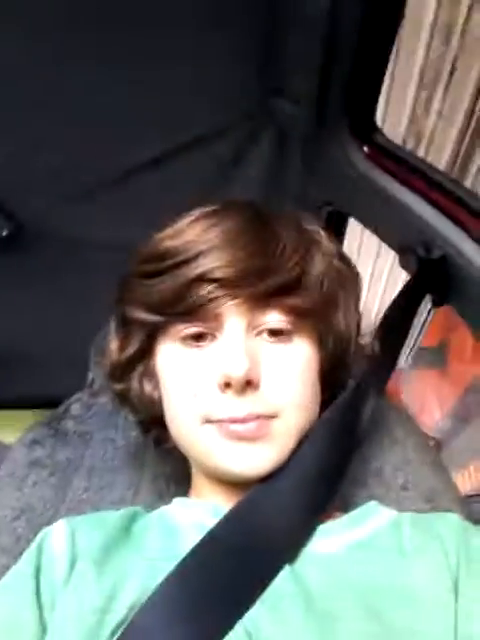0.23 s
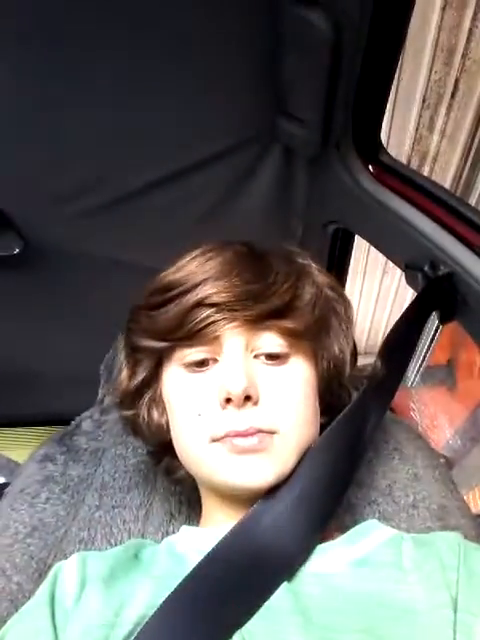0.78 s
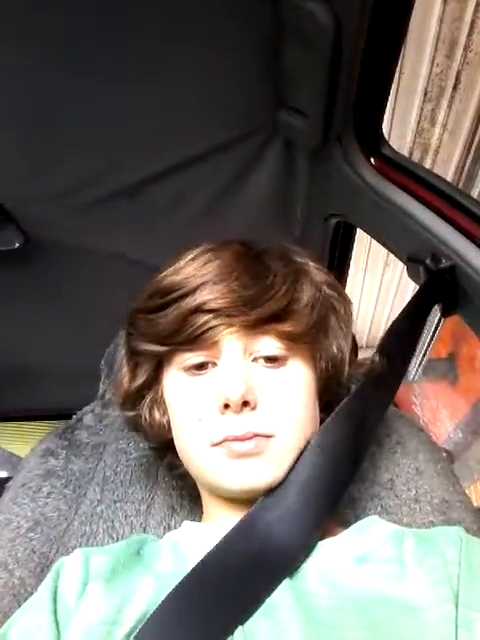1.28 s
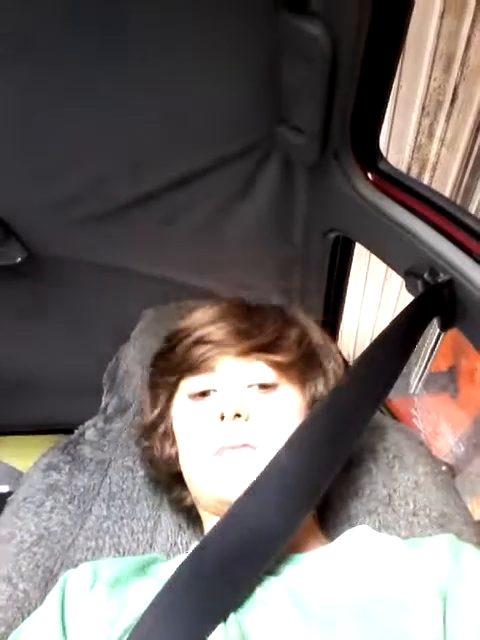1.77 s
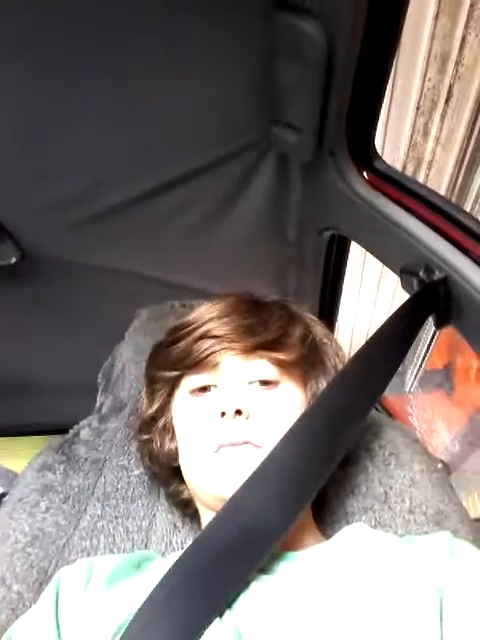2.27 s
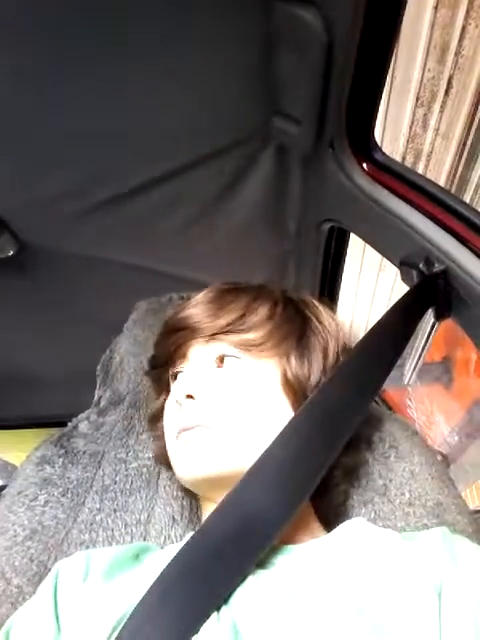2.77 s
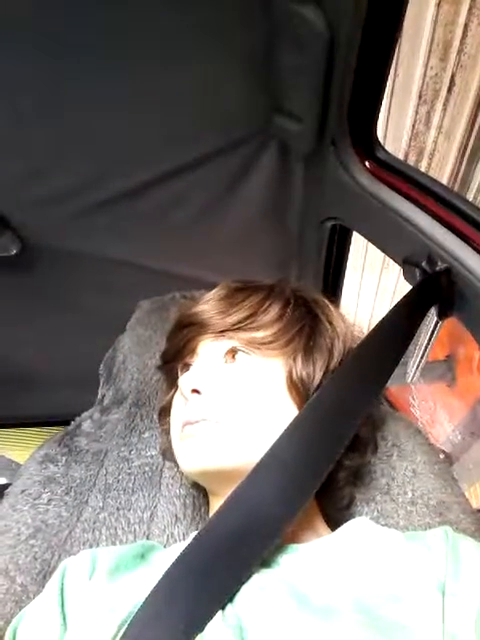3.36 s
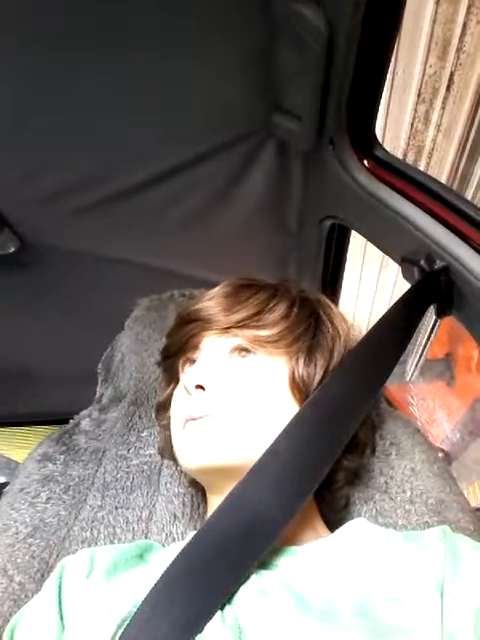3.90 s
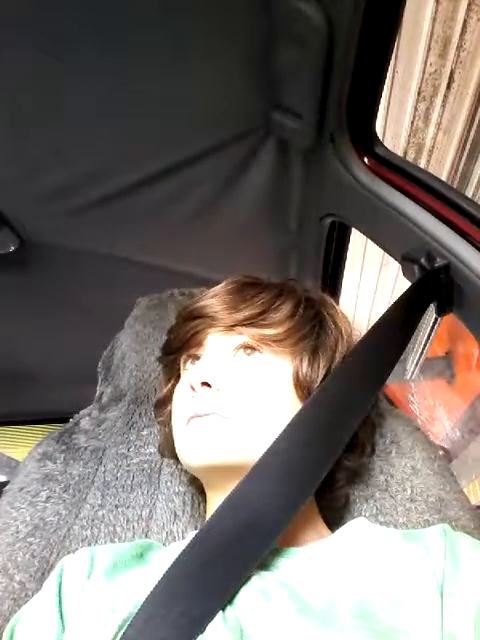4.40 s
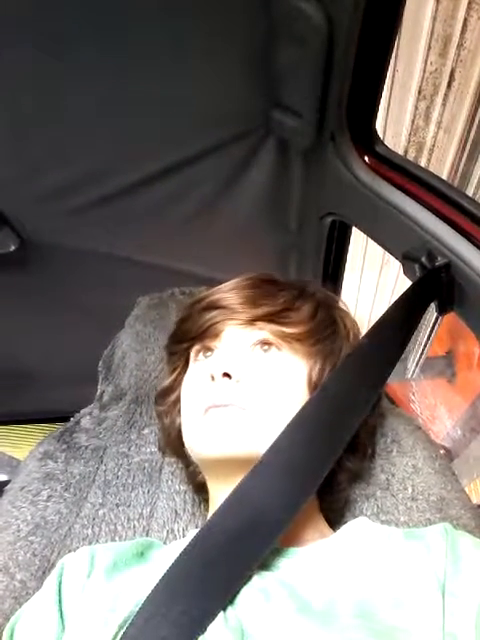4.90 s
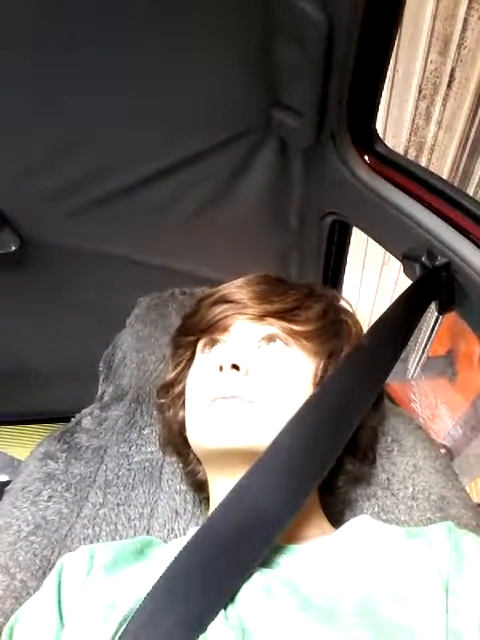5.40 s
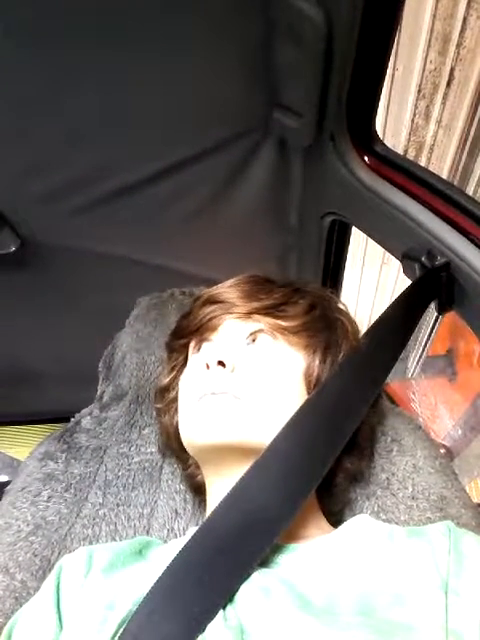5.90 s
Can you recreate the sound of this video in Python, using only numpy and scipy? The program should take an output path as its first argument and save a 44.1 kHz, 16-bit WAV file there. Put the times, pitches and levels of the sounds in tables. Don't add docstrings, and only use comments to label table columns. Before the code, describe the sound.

A small handheld microphone in a car cabin picks up car wash blowers outside. The shaken bodywork rumbles unevenly beneath a broad, dull rush of air. Fluttering hiss and tiny crackling spits of spray build from about one and a half seconds, then shrink back just before three. The rumble weakens in steps, leaving softer roar and a swelling mid-pitched blade tone.

```python
import sys
import numpy as np
from scipy import signal
from scipy.fft import rfft, irfft, next_fast_len
from scipy.io import wavfile
from scipy.ndimage import uniform_filter1d

SR = 44100
rng = np.random.default_rng(int(sys.argv[2]) if len(sys.argv) > 2 else 0)


def boost_factor(decibels):
    exponent = np.asarray(decibels, float) / 20
    return 10 ** exponent


def file_out(sig):
    cols = np.atleast_2d(sig).T
    lim = np.clip(cols, -1, 1)
    pcm = np.round(lim * 32767).astype(np.int16)
    wavfile.write(sys.argv[1], SR, pcm)


N = 271038
SIZE = 1024


def rumble():
    # start_s, level_db (under full blast)
    jet = [
        (0, 1),
        (1.5, -.5),
        (1.8, 0),
        (2.3, -0.5),
        (2.9, -6),
        (3.6, -5.5),
        (4.2, -5),
        (5.0, -11),
        (6.15, -11.5),
    ]
    # start_s, roof_lift_db, door_lift_db
    buffets = [(.11, -4, -1.5), (.37, 5, 2.5), (.5, 4, 3.5), (.66, 5.5, 3.5), (.81, -3.5, 0.5),
               (.9, 1, 3.5), (1.07, 0, 6.5), (1.15, 5, -3), (1.22, -18, 4), (1.46, 2, 1.5), (1.53, 4.5, 3),
               (1.68, 9, -4), (1.77, 2, 6), (1.87, 3.5, -2), (1.95, 6, -8), (2.11, -1, 4.5), (2.19, -5, 4),
               (2.33, 2, 0), (2.48, 4, 2), (2.79, 4.5, 3.5), (2.92, -1.5, -1.5), (3.04, 5.5, -0.5),
               (3.27, -3, 0), (3.61, 1.5, 4.5), (3.93, 5, 0), (4.25, 0.5, -2), (4.54, 1, 3), (5.0, 1, 3),
               (5.19, 6.5, -1.5), (5.95, 1.5, 4)]
    # pitch_hz, level_db (per Hz)
    roof = [(25, -44), (40, -35.5), (52, -7.5), (66, 0.5), (76, 3.5), (88, -5), (97, 12.5), (104, -8.5),
            (112, -1), (135, -7), (200, -61.5), (500, -130)]
    # pitch_hz, level_db (per Hz)
    doors = [(60, -15), (100, -16), (122, 0), (150, -0.5), (172, 1.5), (190, -7), (220, -12), (260, -24.5),
             (400, -80.5), (900, -130)]
    buffet_s = 0.041
    jet_db = curve(jet, column=1)
    roof_db = -23.5 + 1.06 * jet_db + bells(buffets, buffet_s, column=1)
    doors_db = -23 + 0.9 * jet_db + bells(buffets, buffet_s, column=2)
    return panel(roof, 45, 115, roof_db) + panel(doors, 115, 210, doors_db)


def panel(shape, low_hz, high_hz, push_db):
    shake = coloured(lambda hz: read(shape, hz), low_hz, high_hz)
    steadied = shake / np.sqrt(uniform_filter1d(shake ** 2, size=7500))
    return boost_factor(push_db) * steadied


def roar():
    # pitch_hz, level_db (per Hz)
    fan_noise = [(120, -24), (200, -1.5), (290, 2), (330, -3.5), (500, -7.5), (640, -6.5), (1200, -16.5),
                 (1750, -19), (2000, -23), (2500, -23.5), (3800, -28.5), (5300, -36), (7400, -46.5),
                 (9500, -110)]
    # pitch_hz, width_hz, level_db
    cabin = [(276, 100, 2), (321, 18, 1), (356.3, 20, 5), (628, 83, 3), (849, 23, 4), (970, 100, -4.5),
             (1052, 89, 3.5), (1110, 52, 1.5), (1444, 58, 2.5), (1580, 45, 1), (2420, 170, 2),
             (3180, 690, 1), (4300, 200, 1.5), (4540, 150, -2.5)]
    full_db, leave_s, fade_db_per_s = -34, 1.55, -0.6465
    air = coloured(lambda hz: read(fan_noise, hz) + sum(bump(hz, *mode) for mode in cabin), 324, 3000)
    fans_db = full_db + fade_db_per_s * np.maximum(np.arange(N) / SR - leave_s, 0)
    return boost_factor(fans_db) * patchy(air, patchy_db=0.5)


def blades():
    # pitch_hz, width_hz (of its wander)
    blade_line = (591, 7.2)
    # start_s, level_db
    beats = [
        (1.0, 9.5),
        (1.55, -2),
        (2.25, 4),
        (3.0, 3),
        (4.15, -6),
        (4.47, -2),
        (4.9, 7),
        (5.32, 9),
        (5.62, -1),
        (5.9, 7),
    ]
    beat_s = 0.12
    clear_db, mask_db, clears_s = -47, -2.5, 7.4
    blade_hz, width_hz = blade_line
    tone = coloured(lambda hz: -20 * np.log10(1 + (2 * (hz - blade_hz) / width_hz) ** 2), 300, 3000)
    steadied = tone / np.sqrt(uniform_filter1d(tone ** 2, size=16000))
    blade_db = clear_db + mask_db * np.clip(1 - np.arange(N) / SR / clears_s, 0, 1)
    return boost_factor(blade_db + bells(beats, beat_s, column=1)) * steadied


def seal():
    # start_s, level_db (of the hiss)
    leak = [(0, -59), (.75, -58), (1.2, -56), (1.49, -52.5), (1.68, -54), (1.76, -51.5), (2.1, -50.5),
            (2.27, -53.5), (2.32, -50.5), (2.58, -49.5), (2.66, -55), (2.86, -55), (2.94, -61),
            (3.3, -59.5), (3.69, -61), (3.96, -58.5), (6.15, -61.5)]
    # start_s, level_db (over the hiss), length_s
    spits = [(1.387, 1, .02), (1.476, 2, 0.016), (1.625, 4.5, 0.014), (1.709, -5.5, .015),
             (1.742, 4.5, .012), (1.788, 3.5, .02), (1.983, 5.5, .02), (2.052, 5, .02), (2.083, 4, 0.013),
             (2.308, 2.5, .015), (2.334, 1.5, .02), (2.39, 3, .015), (2.603, 1, .013), (2.653, 7.5, 0.033),
             (2.775, 1, .015), (2.818, 1, 0.018), (2.99, 10.5, .025), (3.242, 0, 0.013), (3.355, 5, .02)]
    # pitch_hz, level_db (per Hz)
    hiss_colour = [(1500, -24), (3000, -9), (5500, -12), (7000, -15.5), (7600, -21.5), (8300, -38),
                   (9500, -60), (12000, -110)]
    # pitch_hz, level_db (per Hz)
    fizz_colour = [(3000, -63), (7000, 3), (8300, -1.5), (10200, -4.5), (10800, -4), (13000, -5.5),
                   (16000, -5.5)]
    # pitch_hz, width_hz, level_db
    port = (6430, 860, 12.3)
    t = np.arange(N) / SR
    spits_db = sum(db * np.exp(-(2 * (t - start_s) / length_s) ** 2) for start_s, db, length_s in spits)
    hiss_db = curve(leak, column=1)
    fizz_db = -74 + 0.58 * (hiss_db - leak[0][1])
    wetness = np.clip((hiss_db + 57.0) / 10, 0.2, 1)
    gust_db = wetness * (1.6 * flutter(8, 40) + 1.4 * flutter(40, 250))
    hiss = coloured(lambda hz: read(hiss_colour, hz) + bump(hz, *port), 5860, 7200)
    fizz = coloured(lambda hz: read(fizz_colour, hz), 8500, 15500)
    hiss = boost_factor(hiss_db - 0.5 + spits_db + gust_db) * patchy(hiss, patchy_db=-1.0)
    return hiss + boost_factor(fizz_db + 0.7 * spits_db + 0.98 * gust_db) * fizz


def evened(x):
    return x / np.sqrt(np.mean(x ** 2) + 1e-20)


def read(points, hz):
    f, value = np.transpose(points)
    return np.interp(np.log(hz + 1), np.log(f + 1), value)


def curve(rows, column):
    columns = np.transpose(rows)
    return np.interp(np.arange(N) / SR, columns[0], columns[column])


def bells(rows, length_s, column):
    t = np.arange(N) / SR
    return sum(row[column] * np.exp(-((t - row[0]) / length_s) ** 2) for row in rows)


def bump(hz, centre_hz, width_hz, db):
    return db / (1 + (2 * (hz - centre_hz) / width_hz) ** 2)


def coloured(colour_db, low_hz, high_hz):
    length = next_fast_len(N)
    hz = np.fft.rfftfreq(length, 1 / SR)
    z = rfft(rng.standard_normal(length)) * boost_factor(colour_db(hz))
    in_band = (hz > low_hz) & (hz < high_hz)
    share = np.sum(abs(z[in_band]) ** 2) / np.sum(abs(z) ** 2)
    return evened(irfft(z)[::-1][:N]) / np.sqrt(share)


def flutter(low_hz, high_hz):
    return coloured(lambda hz: -300 * ((hz < low_hz) | (hz > high_hz)), low_hz, high_hz)


def patchy(x, patchy_db):
    z = signal.stft(x, nperseg=SIZE, noverlap=3 * SIZE // 4)[2]
    patches = uniform_filter1d(rng.standard_normal(z.shape), size=10, axis=0)
    patches = uniform_filter1d(patches, size=14, axis=1)
    return signal.istft(z * boost_factor(patchy_db * evened(patches)), nperseg=SIZE, noverlap=3 * SIZE // 4)[1][:N]


def scene():
    return np.tile(rumble() + roar() + blades() + seal(), (2, 1))


def unshared(mono):
    # pitch_hz, likeness (1 = same)
    same = [(100, 1), (2500, .995), (3500, .987), (7000, .985), (8800, .999), (10300, .75), (11800, .95),
            (15500, .85)]
    z = signal.stft(mono, nperseg=SIZE, noverlap=3 * SIZE // 4)[2]
    angle = np.arccos(read(same, np.fft.rfftfreq(SIZE, 1 / SR)))[:, None] / 2
    stray = abs(z) * np.exp(2j * np.pi * rng.random(z.shape))
    shared_part, stray_part = np.cos(angle) * z, np.sin(angle) * stray
    pair = np.array([shared_part + stray_part, shared_part - stray_part])
    return signal.istft(pair, nperseg=SIZE, noverlap=3 * SIZE // 4)[1][:, :N]


def leaned(both):
    # pitch_hz, level_db
    lean_steps = [(0, -1.1), (800, -1.5), (1700, -2), (2400, -3), (3100, -4), (3500, -5.3), (3800, -6.2),
                  (4200, -7.3), (4600, -8.3), (5650, -7.3), (6300, -6), (6900, -3.6), (7600, 0),
                  (9000, 1.2)]
    both = np.pad(both, ((0, 0), (0, next_fast_len(N + SIZE) - N)), "reflect")
    hz = np.fft.rfftfreq(both.shape[1], 1 / SR)
    edge_hz, lean_db = np.transpose(lean_steps)
    fade_out = np.clip((12000 - hz) / 1500, 0, 1)
    lean = boost_factor(lean_db[np.searchsorted(edge_hz, hz + 1) - 1] * fade_out)
    bass_cut = 1 / np.sqrt(1 + (50 / (hz + 1)) ** 10)
    gains = 2 * bass_cut * np.array([lean, np.ones_like(lean)]) / (1 + lean)
    return irfft(rfft(both) * gains, both.shape[1])[:, :N]


def roll_off(x):
    return signal.sosfilt(signal.butter(12, 15720, fs=SR, output="sos"), x)


def record(dry):
    self_noise_db = -77
    mono = dry[0] + boost_factor(self_noise_db) * rng.standard_normal(N)
    return roll_off(leaned(unshared(mono)))


dry = scene()
out = record(dry)
file_out(out)
```